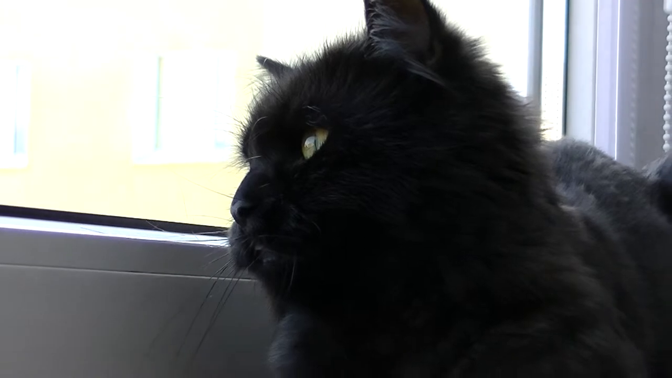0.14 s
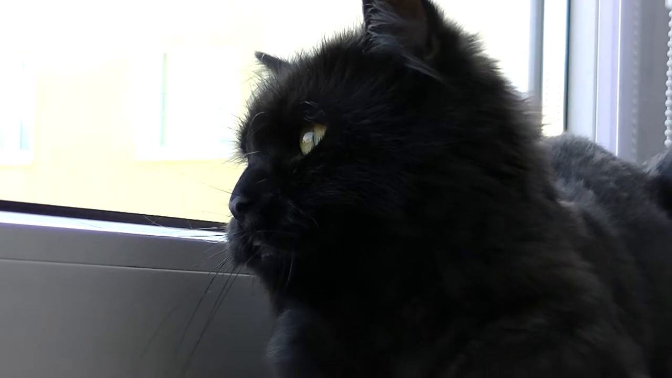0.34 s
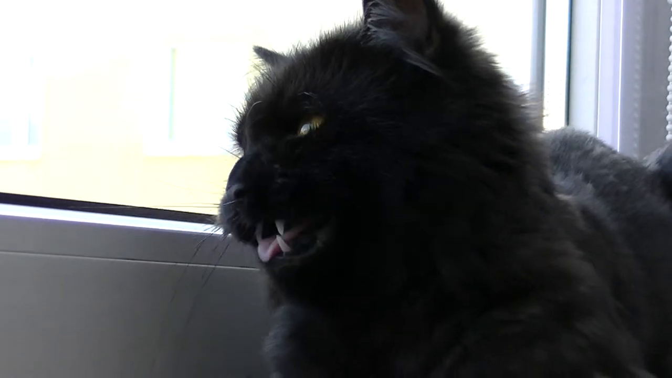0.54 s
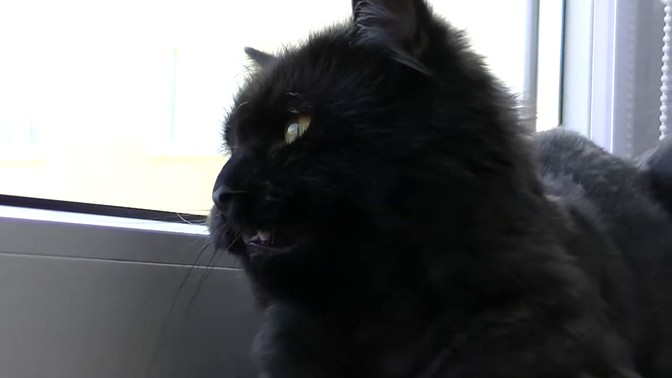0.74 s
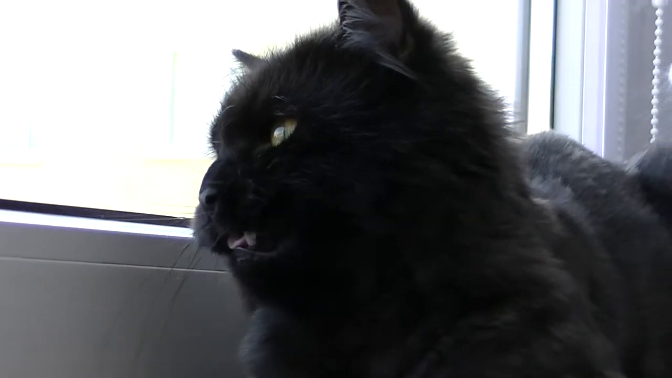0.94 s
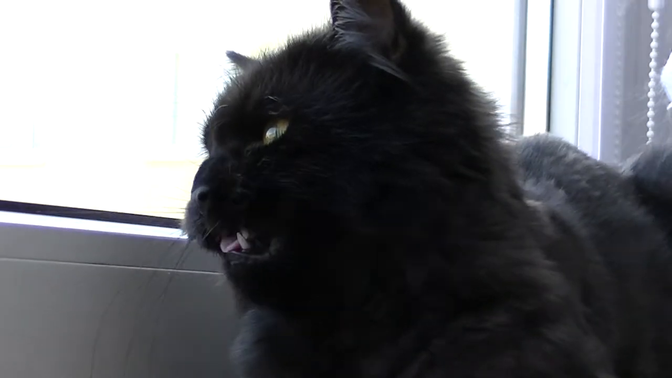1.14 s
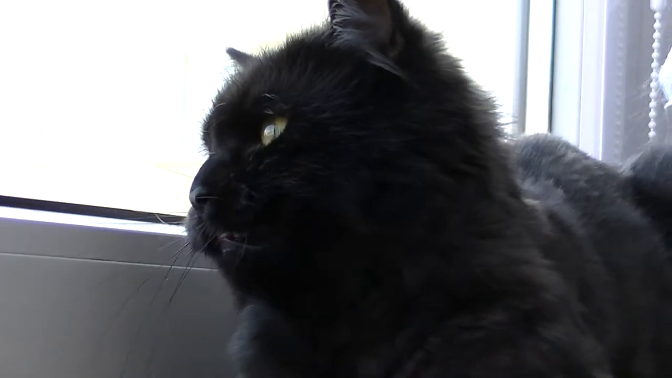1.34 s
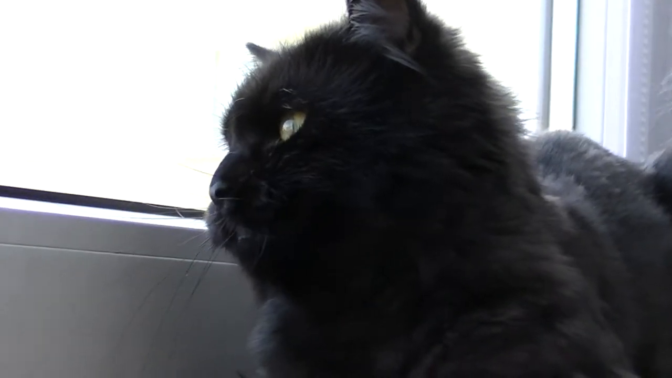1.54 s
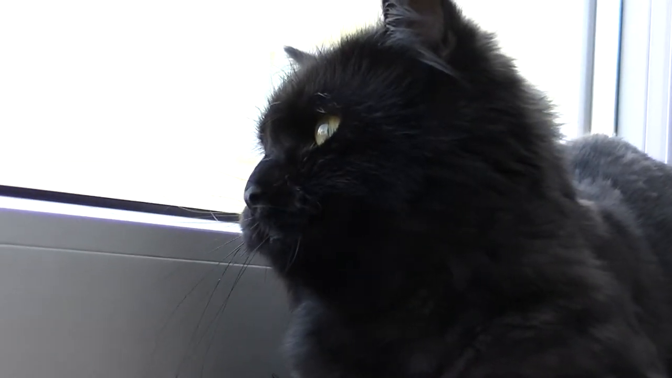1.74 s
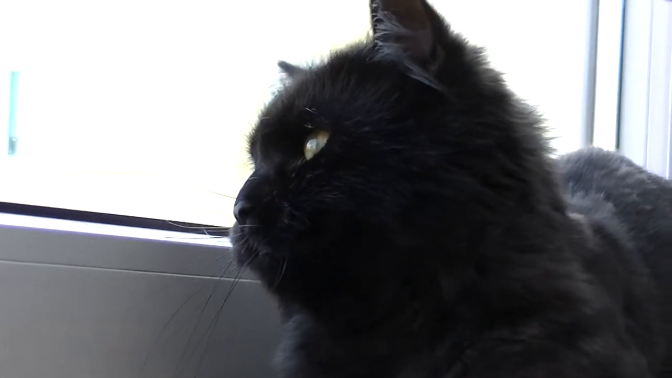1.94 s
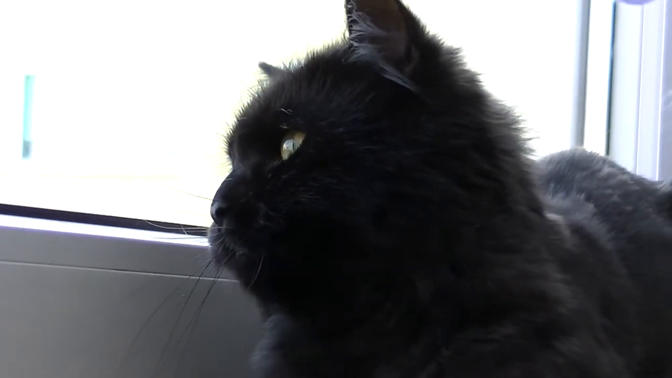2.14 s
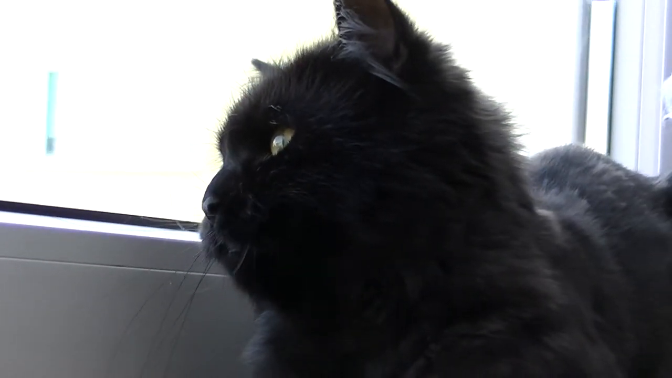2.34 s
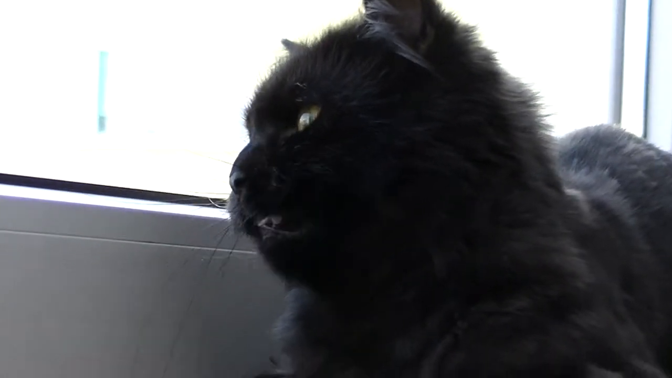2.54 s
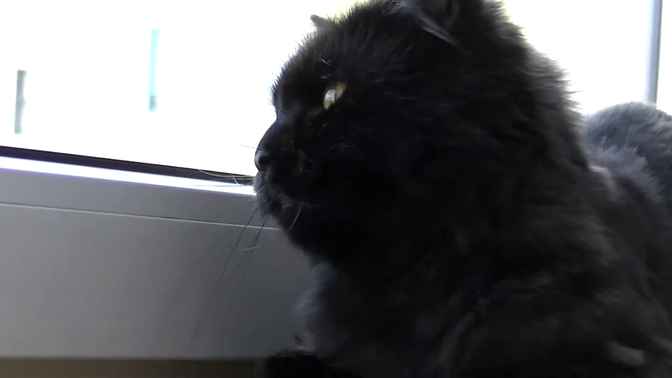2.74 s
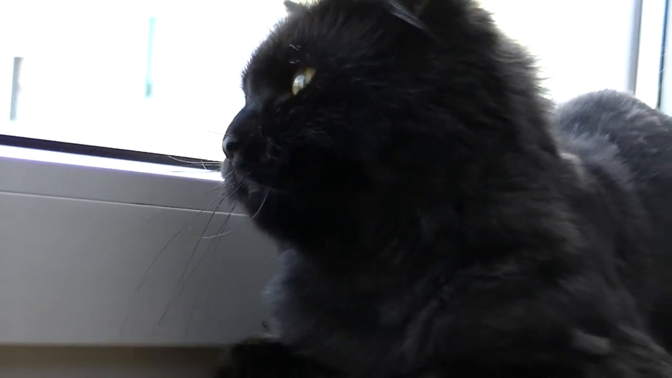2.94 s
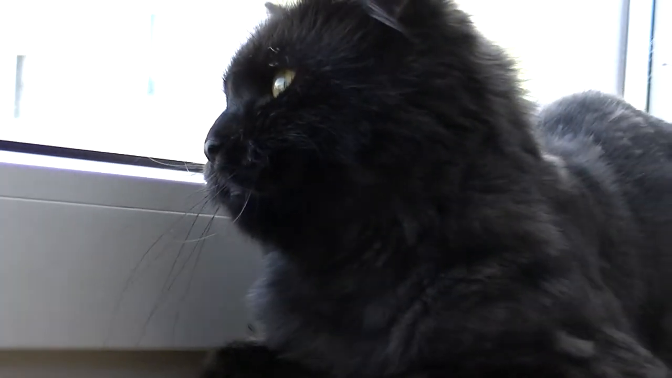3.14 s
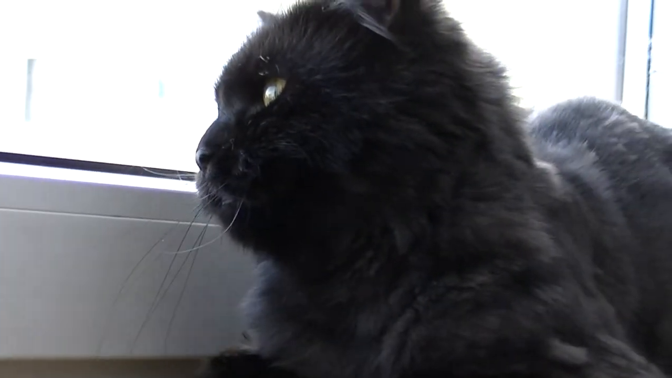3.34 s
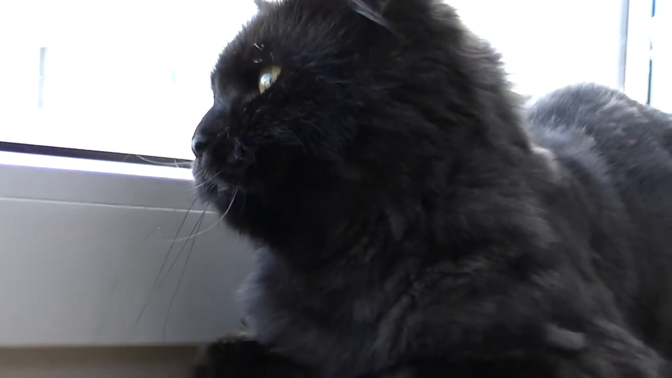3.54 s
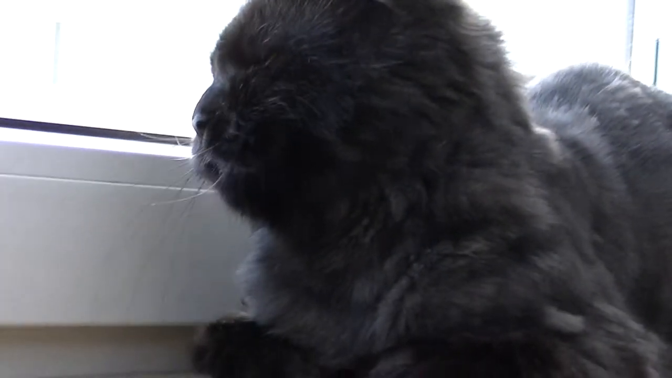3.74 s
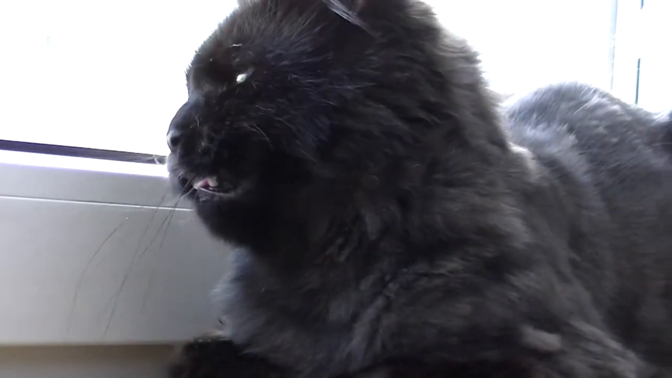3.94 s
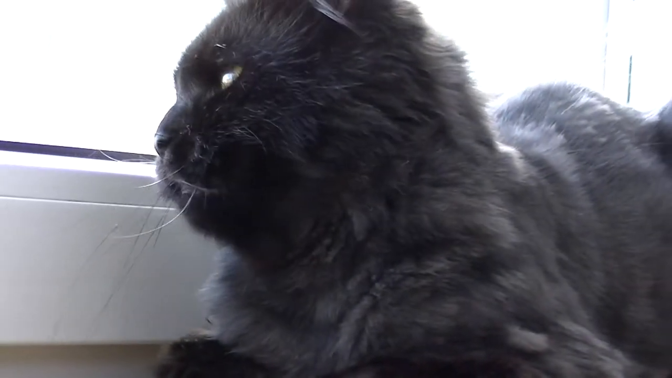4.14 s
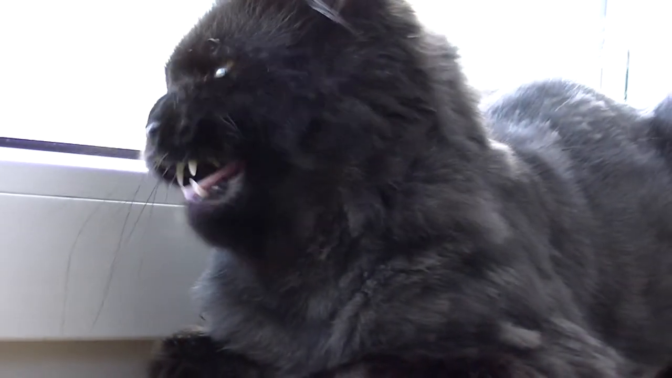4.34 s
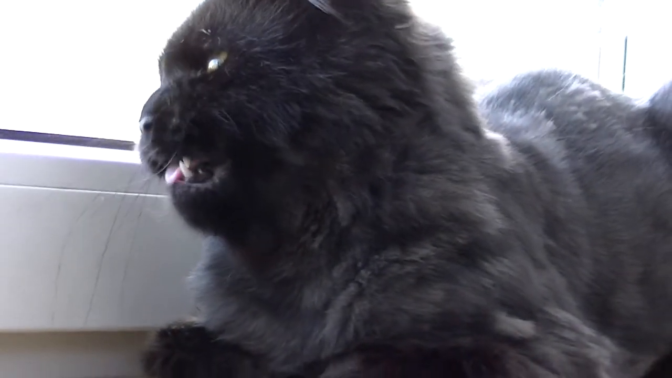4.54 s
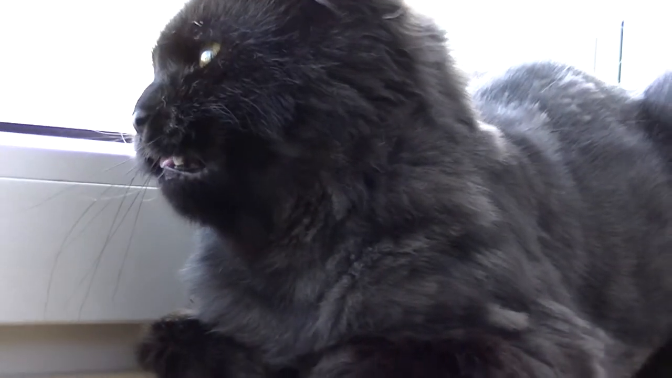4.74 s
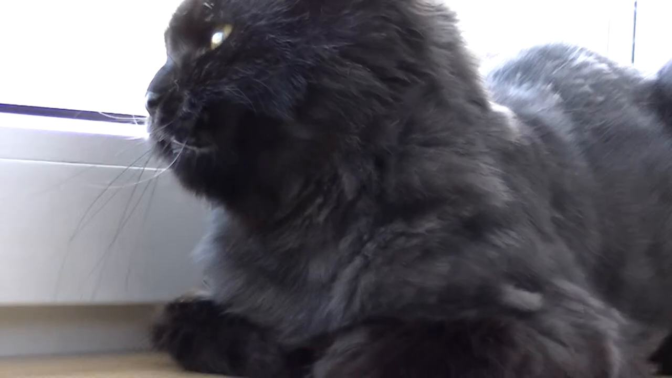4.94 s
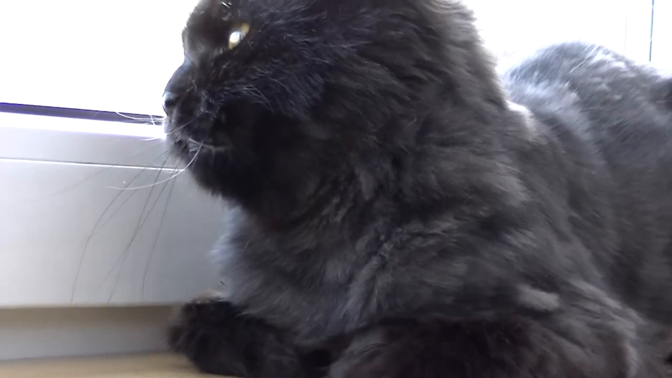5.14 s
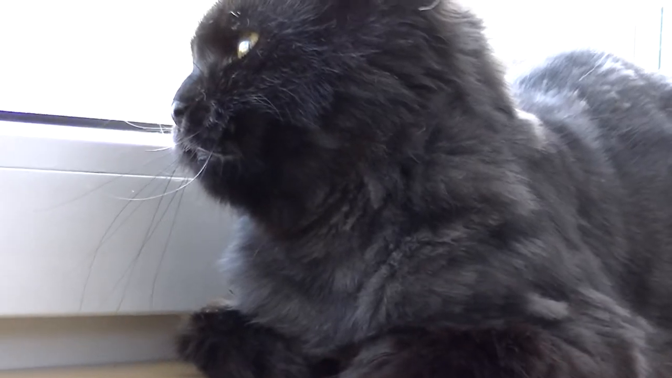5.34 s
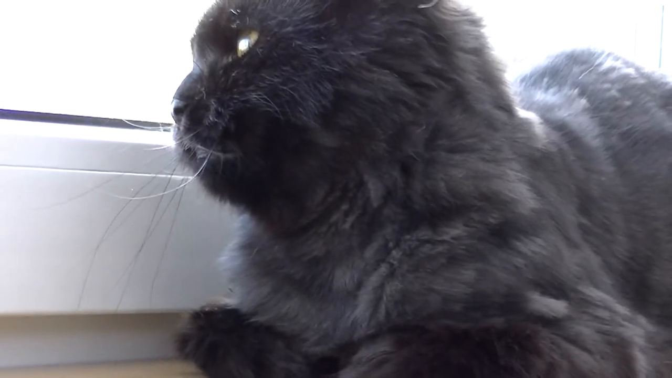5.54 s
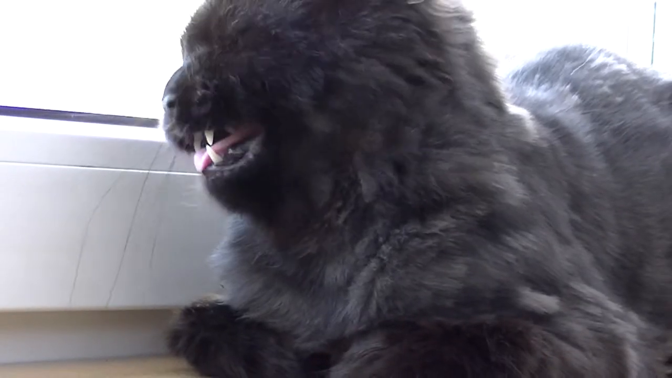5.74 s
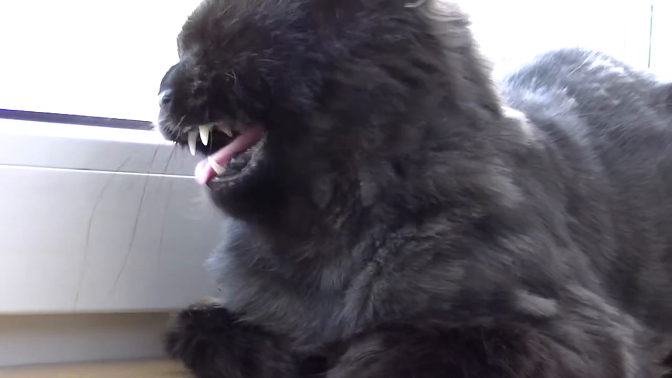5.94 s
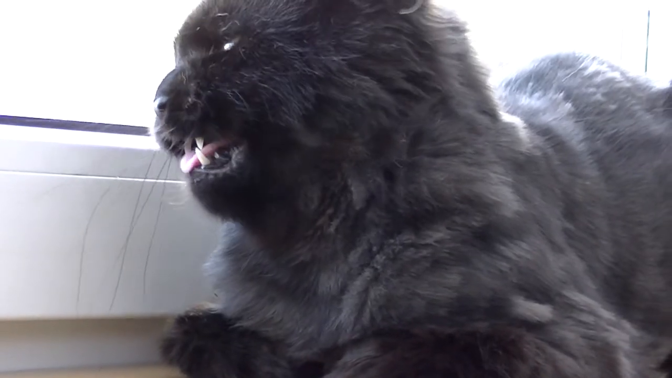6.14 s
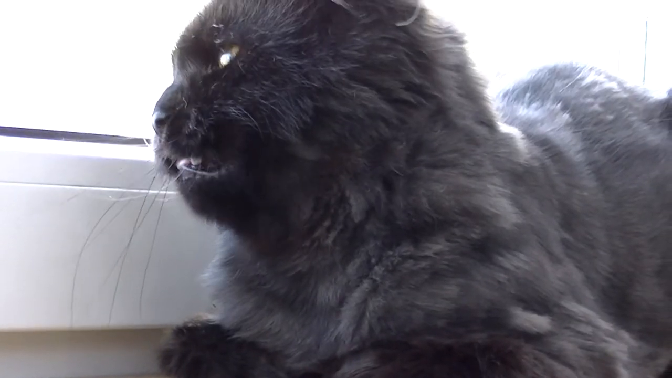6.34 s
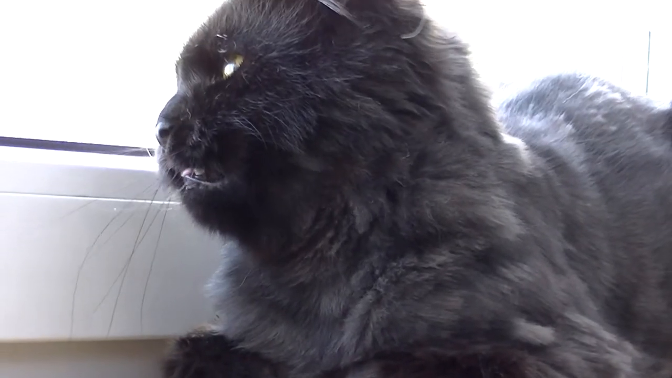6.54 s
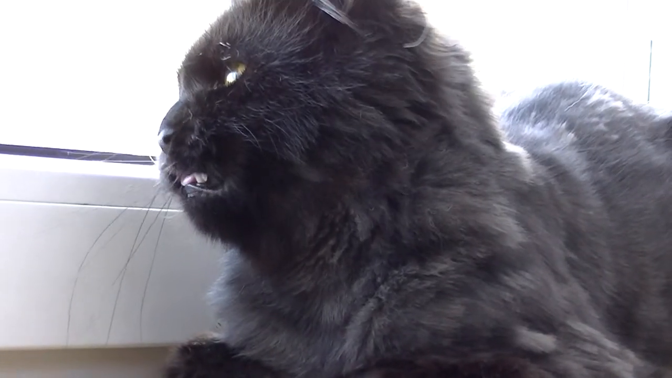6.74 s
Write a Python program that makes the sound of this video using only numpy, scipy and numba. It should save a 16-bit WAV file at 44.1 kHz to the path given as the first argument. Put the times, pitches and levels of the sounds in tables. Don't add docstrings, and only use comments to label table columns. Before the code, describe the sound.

A cat on a window sill, about half a metre from a small microphone, chatters at something outside. Three quick chirps start loud and creaky, then one lone chirp, a cluster of three, a rapid cluster of four and a faint last one. Teeth click inside the chirps, and tongue smacks and wet lip ticks fall between. Soft paw thuds, faint camera focus ticking, a lightly echoing quiet room, muffled street hum and hiss.

```python
import sys
import numpy as np
from scipy import signal
from scipy.fft import rfft, irfft
from scipy.io import wavfile
from scipy.ndimage import uniform_filter1d
from numba import njit

SR = 44100
rng = np.random.default_rng(int(sys.argv[2]) if len(sys.argv) > 2 else 0)


def amplitude_ratio(level_db):
    exponent = np.asarray(level_db, float) / 20
    return 10 ** exponent


def master(y):
    cut = np.clip(np.atleast_2d(y).T, -1, 1)
    pcm = np.round(cut * 32767)
    wavfile.write(sys.argv[1], SR, pcm.astype(np.int16))


N = 304013

# time in seconds, fold rate in Hz, roughness 0-1, effort in dB,
# mouth opening 0-1.
FIRST_CLUSTER = [
    [(.583, 625, 0, -39, 0.3), (.592, 593.7, 0.39, -28.5, 0.87), (.603, 391.6, 0.6, -31.5, 0.91),
     (.622, 312.4, 0.59, -30.5, 0.86), (.645, 232.7, 0.75, -36, 0.81)],
    [(.884, 591.4, .11, -40, 0.41), (.897, 486, 0.65, -39.5, 0.68), (.906, 377.3, 0.39, -35, 0.72),
     (.925, 442.6, 0.39, -40.5, 0.77), (.947, 433, 0.56, -39.5, .46)],
    [(1.138, 429.3, .7, -42.5, .55), (1.157, 361.7, .62, -42, .42), (1.175, 428.6, 0.5, -43.5, 0.83),
     (1.2, 447, 0.17, -43.5, 0.3), (1.21, 480.7, 0.06, -44.5, .23), (1.235, 475, .02, -61, 0.2)],
]
LONE_CHIRP = [
    [(2.453, 524.7, 0.17, -39.5, 0.37), (2.478, 548.6, .17, -41, 0.88), (2.497, 528.3, 0.18, -36.5, 0.61),
     (2.516, 459, .53, -39, 1), (2.538, 330, 0.8, -41.5, 0.29)],
]
SECOND_CLUSTER = [
    [(3.88, 645.5, 0.0043, -48.5, 0.33), (3.906, 571.7, 0.0043, -40.5, .44),
     (3.936, 575.4, 0.093, -43, 0.96), (3.955, 537.4, 0.4, -40.5, 0.21), (3.985, 473, 0.35, -45.5, 0.32),
     (4.015, 457.4, 0.15, -48.5, 0.092), (4.065, 442, 0, -60, .06)],
    [(4.303, 616.4, .03, -38, .39), (4.316, 604, 0.092, -33, .53), (4.328, 489.4, 0.49, -33, 0.99),
     (4.345, 298, .61, -33.5, 0.72), (4.365, 227.9, 0.6, -35.5, 0.84)],
    [(4.57, 571, 0.023, -48.5, 0.086), (4.59, 515.3, 0.44, -44.5, 0.47), (4.605, 464, 0.44, -41, 0.41),
     (4.63, 515.7, 0.21, -39, 0.21), (4.655, 533, 0.29, -51.5, 0.54), (4.677, 515, .07, -41, .12)],
]
THIRD_CLUSTER = [
    [(5.728, 604.5, 0.011, -38, 0.39), (5.755, 622, 0.057, -32, 0.53), (5.768, 574.6, 0.62, -36, 0.8),
     (5.785, 331.5, 0.33, -32, 0.86), (5.808, 238.5, 0.49, -35, 0.68)],
    [(5.94, 619, 0.054, -39.5, 0.42), (5.953, 608.8, 0.192, -37.5, 0.6), (5.968, 398.5, .62, -37.5, 1),
     (5.985, 242, 0.6, -38, 0.57), (6.005, 294.8, 0.54, -39, 0.68), (6.035, 334.7, .41, -46.5, .12)],
    [(6.155, 546, 0.39, -48, .35), (6.172, 487, 0.42, -40.5, 0.46), (6.19, 425.7, 0.31, -37, 0.72),
     (6.205, 448.7, 0.256, -39, 0.3), (6.222, 450, 0.27, -48, 1)],
    [(6.422, 595.4, 0.023, -45.5, 0.19), (6.432, 523, 0.44, -41, .88), (6.446, 407.8, 0.53, -39, 0.69),
     (6.466, 457.8, 0.23, -38.5, 0.9), (6.5, 489.7, .05, -42, .28)],
]
LAST_CHIRP = [
    [(6.81, 554, 0.045, -57, 1), (6.83, 508, .01, -46.5, 0.48), (6.855, 511, 0.054, -43, 0.15),
     (6.875, 469, .08, -49, 0.073), (6.893, 468, .05, -58, 0.12)],
]
# attack in seconds, tongue resonance in Hz,
# lips resonance in Hz, jaw level in dB, lips level in dB.
MOUTH_POSES = [(0.015, 2230, 4700, -6, -8), (.022, 1890, 4530, -3, -10.5), (.006, 2050, 4700, -1, -7),
               (.006, 2060, 4350, -1.5, -8), (.015, 2120, 4100, 2, -10), (.011, 2283, 4260, -5.5, -6.5),
               (.03, 2220, 4005, -1, -4), (.008, 2120, 4410, -4, -7.5), (.012, 2353, 4380, -5.5, -5),
               (.02, 2213, 4250, -4, -2), (0.019, 1940, 4490, 0, -4), (0.0271, 2340, 4420, 1.5, 0.5)]
PALATE_DB = [4, 2.5, 0, -0.5, -3, 2.5, -3, 2, 3.5, -4, -3, -3]

# centre in Hz, width in Hz, level in dB.
JAW_MODES = [(847, 250, 4), (1196, 380, -2)]
PALATE_MODES = [(3430, 3600, -10.5)]
TEETH_MODES = [(5480, 1450, 9.5), (7330, 2600, -9), (8960, 1400, -3.5), (11400, 1500, -7.5),
               (13600, 1200, -8)]
# share of the pose's Hz, width in Hz, level in dB.
TONGUE_MODES = [(0.776, 446, -0.5), (1.01, 332, 1.5), (1.2, 356, -2)]
LIP_MODES = [(.93, 350, -6), (1.01, 380, 0), (1.1, 380, -3)]

# start in seconds, peak in dB, high ring in dB.
TEETH_CLICKS = [(.5895, -24, -4), (.6247, -15, -1), (1.1588, -31, 0), (2.4506, -37, -3), (2.5169, -26, -4),
                (4.3286, -24, 2), (4.3437, -23, -4), (5.7606, -27, -3), (5.7892, -20, -2), (5.9709, -26, 0),
                (5.9817, -27, 3), (6.1941, -26, 3), (6.4271, -34, -2)]
# start in seconds, peak in dB, low ring in Hz, high ring in Hz, contact in seconds.
TONGUE_SMACKS = [
    (.3934, -30.5, 3050, 5950, .0003),
    (1.1631, -33, 4400, 5300, .0006),
    (1.1699, -34, 4200, 5050, .001),
    (2.0829, -39, 2000, 3850, .003),
    (3.7291, -34, 3700, 5000, .0003),
    (6.7431, -37, 2400, 4300, .002),
    (6.7631, -47, 4400, 4800, .002),
]
# start in seconds, peak in dB, low ring in Hz, high ring in Hz,
# contact in seconds.
SMACK_RINGS = [
    (2.084, -39.5, 2750, 5200, 0.0041),
    (3.729, -45, 2210, 7060, .00029),
    (3.733, -47, 3500, 4800, 0.026),
    (6.7431, -42, 6300, 8500, 0.00058),
    (1.1625, -42, 5900, 6900, .0008),
]
# start in seconds, peak in dB, ring in Hz.
LIP_TICKS = [
    (.6853, -46.5, 6700),
    (.9875, -51, 8100),
    (1.2361, -57, 7790),
    (2.626, -50, 8000),
    (4.4266, -47, 7840),
    (4.7264, -52, 8410),
    (4.7595, -45, 7960),
    (6.0701, -47, 7800),
]
# start in seconds, peak in dB.
PAW_THUDS = [
    (3.419, -46),
    (4.995, -49.5),
]

# first step in seconds, number of steps.
MOTOR_RUNS = [
    (1.236, 13),
    (4.6887, 26),
    (6.125, 7),
]
LOW_GEAR_STEPS = [19, 21, 25, 27, 29, 31, 34, 38, 43, 45]

# frequency in Hz, density in dB per Hz.
HUM_SPECTRUM = [(15, -45), (25, -12.5), (149, -17.5), (185, -12.5), (439, -6.5), (476, -8), (607, -2.5),
                (863, -3.5), (988, -2.5), (2690, -13), (4370, -16), (4740, -16), (5570, -16.5),
                (7920, -17.5), (16000, -23.5)]
HUM_SIDE_SPECTRUM = [(15, -35), (25, -9), (263, -12.5), (624, -5), (5730, -22), (8590, -33.5), (10700, -37),
                     (11600, -47), (16000, -35)]
# time in seconds, level in dB.
HUM_LEVEL = [(0, -58), (1.5, -58.5), (2.5, -59.5), (3.5, -59.5), (5.5, -59.5), (6.9, -59.5)]
# frequency in Hz, level in dB rms.
WHINES = [
    (615, -80),
    (120, -91),
]

SILENT_DB, RELEASE_S = -34.5, .016
OPENS_FROM = 0.47
JAW_LAW, TONGUE_LAW, LIPS_LAW = 0.85, 0.82, 1.25
LIPS_ARCH, TONGUE_ARCH = 0.66, 0.23
TONGUE_START, TONGUE_SINK_S = 0.17, 0.016
WANDER, WANDER_S = 0.13, .012
AIR_SLOPE, AIR_MOST = 1.1, .7
HISS_LATE = 1.7
MOUTH_TOP_HZ, TONGUE_TOP_HZ, CLICK_TOP_HZ = 5500, 3600, 5600
CLICK_HZ, CLICK_HIGH_HZ, CLICK_S, CLICK_GAIN_DB = 2440, 4560, 0.00051, 2
SMACK_HIGH_DB = 0
TICK_RATIO, TICK_HIGH_DB, TICK_S = 1.16, -2.5, .00051
THUD_HZ, THUD_HIGH_HZ, THUD_HIGH_DB, THUD_S = 320, 705, -25, 0.00052
ROOM_T60_S, ROOM_DAMP, ROOM_DB = .34, 0.37, -17.5
STEP_S, LOW_LEAD_S = .0399, .003
STEP_HIGH_HZ, STEP_LOW_HZ = 4850, 4060
STEP_DB, LOW_STEP_DB, STEP_SCATTER_DB = -63, -61, 1.5
LINE_HZ, LINE_DB = 7825, -80.5
BASS_CUT_HZ, TOP_HZ = 195, 15740


def voice():
    hz, rough, age, tongue_hz, lips_hz, palate, gains = mouth()
    rough, still = np.clip(rough, 0, 1), np.ones(N)
    chance = rng.standard_normal((N // 30, 2))
    pulses, phase = folds(hz, .006 + .45 * rough ** 2, .5 + 4 * rough, chance)
    air = level(np.exp(-phase / 0.46) * rng.standard_normal(N), 0)

    def excitation(base):
        share = np.clip(base + AIR_SLOPE * rough, 0, AIR_MOST)
        return share * air - np.sqrt(1 - share ** 2) * pulses

    low, mid, high = excitation(.08), excitation(.25), excitation(.4)
    fundamental = level(svf(svf(pulses, hz, 350.0), hz, 350.0), 0)
    jaw = level(cavity(low, JAW_MODES, still), 0)
    tongue = cavity(mid, TONGUE_MODES, tongue_hz) - palate * cavity(mid, PALATE_MODES, still)
    tongue = level(below(tongue, TONGUE_TOP_HZ), 0)
    lips = level(below(cavity(high, LIP_MODES, lips_hz), MOUTH_TOP_HZ), 0)
    hiss = level(cavity(air, TEETH_MODES, still), -0.1)
    lips = lips + hiss * rough ** 2 * (2 * age) ** HISS_LATE
    return sum(gain * part for gain, part in zip(gains, (fundamental, jaw, tongue, lips)))


def mouth():
    rows, t, start = [], np.arange(N) / SR, np.zeros(N)
    chirps = FIRST_CLUSTER + LONE_CHIRP + SECOND_CLUSTER + THIRD_CLUSTER + LAST_CHIRP
    for chirp, palate_db, (attack, *pose) in zip(chirps, PALATE_DB, MOUTH_POSES):
        first, last = chirp[0], chirp[-1]
        before = (first[0] - attack, *first[1:3], first[3] + SILENT_DB, OPENS_FROM * first[4])
        after = (last[0] + RELEASE_S, *last[1:3], last[3] + SILENT_DB, last[4])
        length = after[0] - before[0]
        for row in (before, *chirp, after):
            rows.append((*row, *pose, palate_db, (row[0] - before[0]) / length))
        start += np.exp(-np.abs(t - first[0]) / TONGUE_SINK_S)
    hz, rough, effort_db, opening, tongue_hz, lips_hz, jaw_db, lips_db, palate_db, age = curves(rows)
    arch = np.abs(np.sin(np.pi * age ** 0.79))
    opening, effort = np.clip(opening, .01, .99), amplitude_ratio(effort_db)
    gains = (effort * (1 - opening),
             effort * amplitude_ratio(jaw_db) * opening ** JAW_LAW,
             effort * opening ** TONGUE_LAW * arch ** TONGUE_ARCH,
             effort * amplitude_ratio(lips_db) * opening ** LIPS_LAW * arch ** LIPS_ARCH)
    tongue_hz = tongue_hz * (1 + TONGUE_START * start) * wander(rough)
    return hz, rough, age, tongue_hz, lips_hz * wander(rough), amplitude_ratio(palate_db), gains


def wander(rough):
    k = int(WANDER_S * SR)
    drift = uniform_filter1d(uniform_filter1d(rng.standard_normal(N), k), k)
    return 1 + WANDER * rough * np.sqrt(k) * drift


def curves(rows):
    s, *columns = np.transpose(rows)
    return [np.interp(np.arange(N) / SR, s, c) for c in columns]


@njit
def folds(hz, jitter, shimmer_db, chance):
    pulses, phase = np.zeros(len(hz) + 1), np.empty(len(hz))
    p, k = 0., 0
    for i in range(len(hz)):
        step = hz[i] * np.exp(jitter[i] * chance[k, 0]) / SR
        p += step
        if p >= 1:
            p, k = p - 1, k + 1
            size = 10 ** (shimmer_db[i] * chance[k, 1] / 20) / np.sqrt(step)
            pulses[i] += size * p / step
            pulses[i + 1] += size * (1 - p / step)
        phase[i] = p
    return pulses[:-1], phase


def cavity(x, modes, scale):
    total = 0
    for k, (hz, width, db) in enumerate(modes):
        once = svf(x, hz * scale, 1. * width)
        total = total + (-1) ** k * amplitude_ratio(db) * svf(once, hz * scale, 1. * width)
    return total


@njit
def svf(x, hz, width):
    y, b, l = np.empty(len(x)), 0., 0.
    for i in range(len(x)):
        g, k = np.tan(np.pi * hz[i] / SR), width / hz[i]
        v = (b + g * (x[i] - l)) / (1 + g * (g + k))
        b, l, y[i] = 2 * v - b, l + 2 * g * v, k * v
    return y


def below(x, hz):
    return signal.sosfilt(signal.butter(8, hz, fs=SR, output="sos"), x)


def level(x, db):
    return x * amplitude_ratio(db) / np.sqrt(np.mean(x ** 2))


def knocks():
    teeth = [(s, db, CLICK_HZ, CLICK_HIGH_HZ, high_db, CLICK_S) for s, db, high_db in TEETH_CLICKS]
    tongue = [(*row[:4], SMACK_HIGH_DB, row[4]) for row in TONGUE_SMACKS]
    rings = [(*row[:4], SMACK_HIGH_DB, row[4]) for row in SMACK_RINGS]
    ticks = [(s, db, hz, TICK_RATIO * hz, TICK_HIGH_DB, TICK_S) for s, db, hz in LIP_TICKS]
    paws = [(s, db, THUD_HZ, THUD_HIGH_HZ, THUD_HIGH_DB, THUD_S) for s, db in PAW_THUDS]
    hard = amplitude_ratio(CLICK_GAIN_DB) * below(taps(teeth + tongue, damping=0.62), CLICK_TOP_HZ)
    return hard + taps(ticks + rings, damping=0.25) + taps(paws, damping=0.97)


def taps(table, damping):
    size = 2048
    out, n = np.zeros(N + size), np.arange(size)
    for s, db, low_hz, high_hz, high_db, contact in table:
        crackle = rng.standard_normal(size)
        push = (crackle + 8 * (n == 0)) * np.exp(-n / (max(contact, 1e-4) * SR))
        width = damping * low_hz
        ring = cavity(push, [(low_hz, width, 0), (high_hz, width, high_db)], np.ones(size))
        out[int(s * SR):][:size] += ring * amplitude_ratio(db) / np.abs(ring).max()
    return out[:N]


@njit
def walls(x, lags, gain, damp):
    line, soft, out = np.zeros((8, 4096)), np.zeros(8), np.zeros((2, len(x)))
    for i in range(len(x)):
        total = 0.
        for k in range(8):
            soft[k] += (1 - damp) * (gain[k] * line[k, (i - lags[k]) & 4095] - soft[k])
            total += soft[k]
            out[k % 2, i] += soft[k]
        for k in range(8):
            line[k, i & 4095] = x[i] + soft[k] - total / 4
    return out


def focus():
    s = np.concatenate([first + STEP_S * np.arange(count) for first, count in MOTOR_RUNS])
    low = np.isin(np.arange(len(s)), LOW_GEAR_STEPS)
    db = np.where(low, LOW_STEP_DB, STEP_DB) + STEP_SCATTER_DB * rng.standard_normal(len(s))
    steps = np.transpose([s - LOW_LEAD_S * low, db])
    high_gear = motor(steps[~low], hz=STEP_HIGH_HZ, sweep=0.0018, length=0.00291)
    return high_gear + motor(steps[low], hz=STEP_LOW_HZ, sweep=0.024, length=0.003)


def motor(table, hz, sweep, length):
    out, t = np.zeros(N), np.arange(-3, 3, 1 / (length * SR))
    turn = 2 * np.pi * hz * length * (t + sweep * t ** 2 / 2)
    whine = np.exp(-(t + 1) ** 2 / 2) * np.sin(turn)
    for s, db in table:
        out[int(s * SR):][:len(t)] += amplitude_ratio(db) * whine
    return out


def street_and_hiss():
    t = np.arange(N) / SR
    mid = coloured(HUM_SPECTRUM) * amplitude_ratio(np.interp(t, *np.transpose(HUM_LEVEL)))
    mid = mid + level(np.sin(2 * np.pi * LINE_HZ * t), LINE_DB)
    for hz, db in WHINES:
        mid = mid + level(svf(rng.standard_normal(N), np.full(N, 1. * hz), 8.8), db)
    return mid + amplitude_ratio(-68) * coloured(HUM_SIDE_SPECTRUM) * np.array([[1], [-1]])


def coloured(spectrum):
    hz, db = np.transpose(spectrum)
    axis = np.log(np.fft.rfftfreq(N, 1 / SR) + 1)
    shape = amplitude_ratio(np.interp(axis, np.log(hz), db))
    return level(irfft(rfft(rng.standard_normal(N)) * shape, N), 0)


def scene():
    cat = voice() + knocks()
    cat = signal.sosfilt(signal.butter(6, BASS_CUT_HZ, "high", fs=SR, output="sos"), cat)
    lags = rng.integers(250, 1800, 8)
    left, right = walls(cat + 1e-18, lags, amplitude_ratio(-60 * lags / SR / ROOM_T60_S), ROOM_DAMP)
    room = amplitude_ratio(ROOM_DB) * (left + right + .12 * (left - right) * np.array([[1], [-1]]))
    return cat + room + focus() + street_and_hiss()


def roll_off(x):
    return signal.sosfilt(signal.butter(12, 16460, fs=SR, output="sos"), x)


def record(dry):
    top = signal.ellip(10, .1, 60, TOP_HZ, fs=SR, output="sos")
    mix = signal.sosfilt(top, dry) * amplitude_ratio(np.array([[.2], [-.2]]))
    return roll_off(mix)


dry = scene()
out = record(dry)
master(out)
```